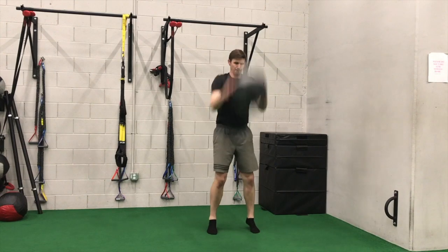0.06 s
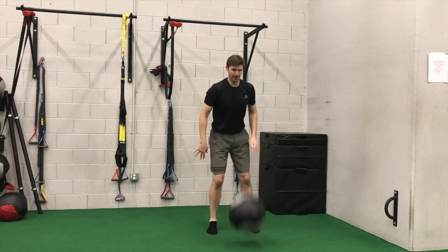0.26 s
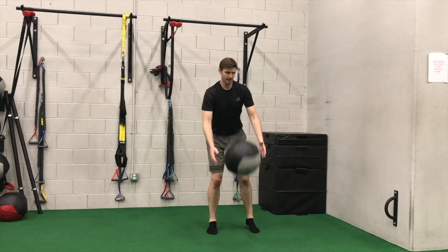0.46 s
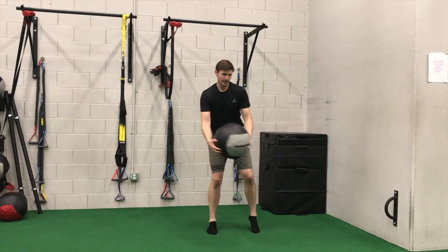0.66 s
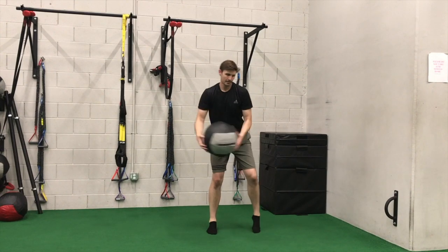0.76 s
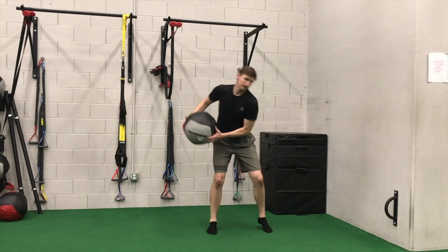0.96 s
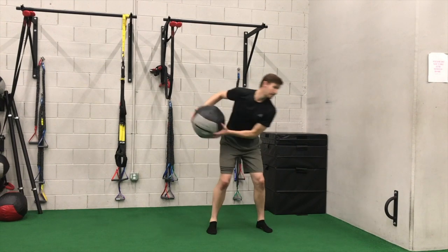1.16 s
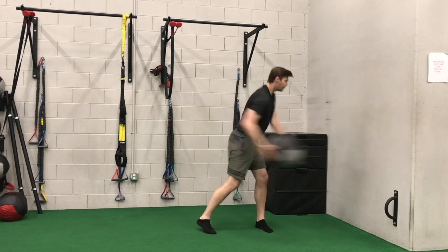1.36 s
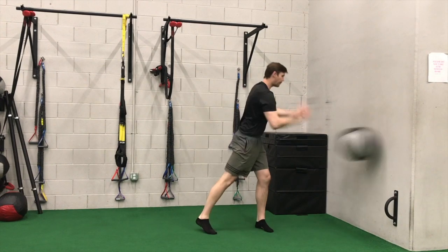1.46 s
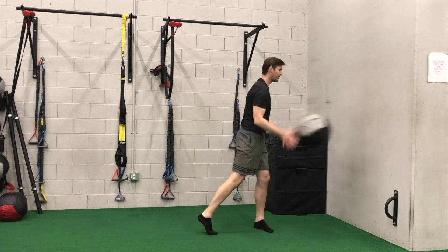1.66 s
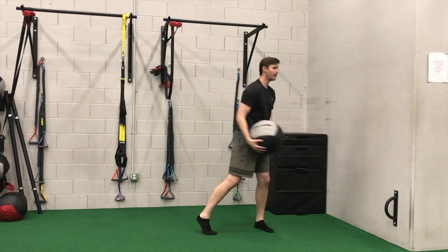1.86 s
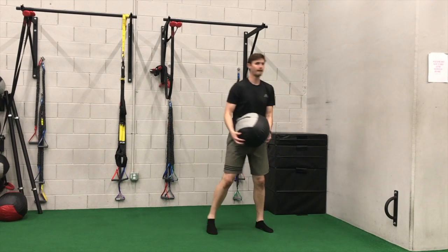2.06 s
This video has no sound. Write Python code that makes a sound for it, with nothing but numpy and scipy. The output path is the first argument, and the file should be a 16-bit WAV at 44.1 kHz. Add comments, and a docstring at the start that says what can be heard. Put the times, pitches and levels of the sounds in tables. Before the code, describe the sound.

A heavy medicine ball slams onto turf with a booming thud and is caught. About a second later it smacks brightly against a hard wall and is caught again. Both hits echo around a large gym.

```python
"""A heavy medicine ball in a large block-walled gym; ventilation hums faintly throughout.
Clothes rustle, hands pat the ball, then slam it onto turf: ball and floor thud, the room rings on.
The ball rebounds, humming until the hands catch and damp it. Feet shift on the turf.
Flung against a hard wall, its skin smacks brightly; quick echoes run into reverberation.
Hands catch it again."""
import sys
import numpy as np
from scipy import signal
from scipy.fft import rfft, irfft, next_fast_len
from scipy.io import wavfile
from scipy.ndimage import uniform_filter1d

SR = 44100
rng = np.random.default_rng(int(sys.argv[2]) if len(sys.argv) > 2 else 0)


def store_wav(level_fs):
    """Save 16-bit WAV to argv[1]."""
    pcm = np.round(np.clip(np.atleast_2d(level_fs), -1, 1) * 32767)
    wavfile.write(sys.argv[1], SR, pcm.T.astype(np.int16))


N = 92610
SLAM_S, SMACK_S = 0.2295, 1.5095

# Modes of ball and struck surface: pitch_hz, level_db, t60_s
BALL_FLOOR_MODES = [(186.7, -14.5, 0.18), (328.5, -12, 0.11), (388, -21.5, 0.18), (497, -14, 0.093),
                    (613, -19, 0.17), (683, -15.5, 0.1), (970, -25, 0.084), (1144, -23, 0.087),
                    (1220, -29, 0.076), (1707, -34.5, 0.12), (2294, -29.5, .08)]
SQUASH_BOOM_MODES = [(45.9, -16.5, 0.42), (74.6, -4.5, .2)]
BALL_WALL_MODES = [(49, -18, 0.34), (78.6, -17.5, .35), (160, -29, 0.49), (244.5, -26, .3),
                   (304, -33.5, 0.47), (613, -22, 0.083), (713, -20.5, 0.089), (1203, -35, 0.2),
                   (1535, -33, 0.075), (2271, -33.5, 0.22), (3444, -35, 0.29), (6260, -44, .2),
                   (7060, -38, .2), (8642, -37, .2), (9400, -27, 0.25)]
# Smack and its floor and side-wall echoes: delay_s, level_db, t60_s
SMACK_ARRIVALS = [(0, -13.5, 0.051), (.0055, -15.5, 0.072), (0.0107, -21, 0.043), (0.0159, -12, .06),
                  (.024, -23, 0.04)]
# Hands on the ball: start_s, slap_db, knock_db, knock_hz, thump_db, thump_hz
HAND_PATS = [(.119, -64, -38.5, 494, -60, 120), (.1375, -54, -26, 455, -41, 85),
             (.153, -60, -48, 332, -36.5, 180), (0.46, -73, -26.5, 594, -30.5, 183.4),
             (.597, -47, -35, 637, -64, 153), (.645, -72, -52, 302, -40, 148),
             (1.457, -40, -39, 560, -30, 112), (1.771, -30.5, -21, 563, -23, 81),
             (1.803, -48, -35, 1018, -32, 128)]
# Cloth and palms sliding: centre_s, level_db, width_s
RUSTLE_SWELLS = [(.07, -60.5, 0.028), (0.146, -51.5, 0.028), (0.594, -47.5, 0.016), (.85, -63.5, 0.081),
                 (1.41, -61.5, 0.11), (1.47, -55.5, 0.042), (1.821, -43, 0.026)]
# Air pushed aside by ball and arms: centre_s, level_db, width_s
WHOOSH_SWELLS = [(.14, -49.5, 0.021), (.226, -43, .012), (1.466, -46.5, 0.033), (1.507, -48, 0.0057)]
# Feet shifting on turf: start_s, level_db
FOOT_SCUFFS = [(1.237, -53), (1.321, -44.5), (1.427, -50)]
# Ventilation hum and whines: pitch_hz, level_db
VENT_TONES = [(59.2, -66), (2347, -82), (3133, -80), (4690, -80.5), (5480, -84.5), (6288, -88),
              (7074, -79.5), (7790, -89)]
# Room decay before stretch: freq_hz, t60_s
ROOM_DECAY = [(50, 1.37), (150, 1.38), (500, 1.04), (2000, 1.22), (4000, 1.19), (8000, 0.93), (11000, 1),
              (15000, 0.38)]

# Impact noise spectra (contact, near walls, whole room): freq_hz, relative_db
SLAM_CRACK_SPECTRUM = [(130, -12), (220, -7.5), (650, 3), (850, -9), (1200, -2), (1500, -13), (2300, -11),
                       (3000, -20), (4300, -21), (5300, -30), (8500, -27), (16000, -52)]
SLAM_NEAR_SPECTRUM = [(82, -33), (140, -4), (370, -6), (619, -5), (958, -23), (1320, -10.5), (1420, -28),
                      (2200, -18), (2850, -28.5), (4070, -28.5), (4870, -37), (8480, -29.5), (16000, -50)]
SLAM_FAR_SPECTRUM = [(36, -2.5), (55, -8), (80, -13), (118, -13), (175, -11), (240, -19.5), (285, -13.5),
                     (485, -21), (600, -13.5), (830, -22), (1200, -25.5), (2410, -33.5), (5000, -42.5),
                     (8540, -50.5), (12000, -70)]
SMACK_CRACK_SPECTRUM = [(120, -25), (200, -7.5), (490, -10), (700, -5), (900, -8.5), (1300, -8),
                        (2300, -7.5), (2700, -13), (3600, -12), (4500, -10), (4850, -14), (5500, -11.5),
                        (9200, -9), (10500, -13.5), (14500, -22), (16000, -29)]
SMACK_NEAR_SPECTRUM = [(65, -22), (110, -15), (167, -9), (243, -9.5), (454, -15), (607, -9.5), (921, -20.5),
                       (1550, -21), (2260, -13.5), (2900, -25), (3350, -15.5), (4880, -18), (8740, -12.5),
                       (16000, -42)]
SMACK_FAR_SPECTRUM = [(16, -26), (28, 9), (44, -0.5), (109, -7), (166, -4), (195, -10), (234, -3),
                      (340, -20), (578, -10.5), (1390, -22.5), (2180, -17.5), (2430, -20), (3520, -18.5),
                      (8460, -20), (16000, -45)]
# Handling and background noise spectra: freq_hz, relative_db
SKIN_SPECTRUM = [(300, -18), (1000, 3.5), (2000, -6), (5000, -10), (7500, -2), (9000, 0.5), (10500, -11),
                 (15500, -21)]
DULL_SPECTRUM = [(65, 1), (200, -1.5), (600, -4), (1200, -20), (3000, -29.5), (8000, -46)]  # palm knocks and whooshes
CLOTH_SPECTRUM = [(400, -12), (1000, 2), (2500, -4.5), (5000, -10.5), (7500, -5), (9000, -0.5),
                  (10500, -10), (15500, -21)]
SCUFF_SPECTRUM = [(200, -12), (700, 7), (2200, -3), (4000, -12), (9000, -19), (14000, -33)]
VENT_SPECTRUM = [(36, -2.5), (58, -5), (110, -16), (184, -21.5), (275, -18), (450, -24.5), (618, -21.5),
                 (837, -30.5), (1230, -30), (1490, -38.5), (1910, -28.5), (2800, -37.5), (4140, -35.5),
                 (7190, -42), (9000, -35), (10500, -42.5), (12000, -49), (16000, -58)]


def floor_slam(squash_s=0.0057):
    """Turf dulls the crack; the ball flattens and booms; near walls, then the whole room answer."""
    modes = ring(SLAM_S, BALL_FLOOR_MODES)
    boom = ring(SLAM_S + squash_s, SQUASH_BOOM_MODES)
    contact = strike(SLAM_S, attack_s=0.0004, t60_s=0.038)
    contact += amp(-11) * strike(SLAM_S + 0.01, attack_s=0.003, t60_s=0.047)
    crack = amp(-10.5) * noise(SLAM_CRACK_SPECTRUM) * contact
    near = amp(-23) * noise(SLAM_NEAR_SPECTRUM) * strike(SLAM_S + 0.0028, attack_s=0.0024, t60_s=0.37)
    far = amp(-27) * reverb_tail(SLAM_S, SLAM_FAR_SPECTRUM, build_s=0.039, stretch=1.0)
    return modes + boom + crack + near + far


def wall_smack():
    """Skin slaps flat on the hard wall; a volley of echoes runs into reverberation."""
    crack = sum(amp(db) * noise(SMACK_CRACK_SPECTRUM) * strike(SMACK_S + delay_s, 0.0003, t60_s)
                for delay_s, db, t60_s in SMACK_ARRIVALS)
    near = amp(-19.5) * noise(SMACK_NEAR_SPECTRUM) * strike(SMACK_S + 0.014, attack_s=0.013, t60_s=0.38)
    far = amp(-26) * reverb_tail(SMACK_S, SMACK_FAR_SPECTRUM, build_s=0.076, stretch=1.08)
    return ring(SMACK_S, BALL_WALL_MODES) + crack + near + far


def rebound(start_s=0.31, caught_s=0.483, pitch_hz=85.4, rise_s=0.015, t60_s=0.087):
    """The ball hums in flight until the hands damp it."""
    rise = np.clip(since(start_s) / rise_s, 0, 1)
    damping = amp(-60 * since(caught_s) / t60_s)
    return amp(-31.5) * rise * damping * np.sin(2 * np.pi * pitch_hz * since(start_s))


def hands(knock_t60_s=0.03, thump_t60_s=0.13):
    """Each pat slaps the skin, knocks the hollow shell and thumps the filling."""
    out = np.zeros(N)
    for start_s, slap_db, knock_db, knock_hz, thump_db, thump_hz in HAND_PATS:
        out += amp(slap_db) * noise(SKIN_SPECTRUM) * strike(start_s, 0.00035, t60_s=0.045)
        out += amp(knock_db - 10.5) * noise(DULL_SPECTRUM) * strike(start_s, 0.00033, t60_s=0.04)
        out += ring(start_s, [(knock_hz, knock_db, knock_t60_s), (thump_hz, thump_db, thump_t60_s)])
    return out


def movement(grain_db=3.6):
    """Cloth slides in grainy swells, displaced air whooshes, feet scuff the turf."""
    flicker = unit_rms(uniform_filter1d(rng.standard_normal(N), size=130))
    grain = unit_rms(amp(grain_db * flicker))
    rustle = swells(RUSTLE_SWELLS) * grain * noise(CLOTH_SPECTRUM)
    whoosh = swells(WHOOSH_SWELLS) * noise(DULL_SPECTRUM)
    steps = sum(amp(db) * strike(start_s, 0.00068, t60_s=0.028) for start_s, db in FOOT_SCUFFS)
    return rustle + whoosh + steps * noise(SCUFF_SPECTRUM)


def reverb_tail(start_s, spectrum, build_s, stretch):
    """Late reverberation: builds up, then decays per frequency; stretch scales the room's t60."""
    hz, time_s, bins = signal.stft(noise(spectrum), SR, nperseg=512)
    t60_s = stretch * log_interp(ROOM_DECAY, hz)[:, None]
    fade = amp(-60 * np.maximum(time_s - start_s, 0) / t60_s)
    tail = signal.istft(bins * fade, SR, nperseg=512)[1][:N]
    return tail * (1 - np.exp(-since(start_s) / build_s))


def in_room(x, wet_db):
    """A small sound plus its faint reverberation."""
    tail = reverb_tail(0, [(40, 0), (16000, 0)], build_s=0.0036, stretch=0.61)
    return x + amp(wet_db) * signal.fftconvolve(x, tail / np.linalg.norm(tail))[:N]


def ventilation(drift_rad=4.3):
    """Steady rumble and hiss, with a hum and thin whines that wander in phase."""
    tones = np.zeros(N)
    for hz, db in VENT_TONES:
        walk = np.cumsum(rng.standard_normal(N)) / np.sqrt(SR)  # rms 1 after 1 s
        phase_rad = 2 * np.pi * hz * since(0) + drift_rad * np.sqrt(hz / 3000) * walk
        tones += amp(db) * np.sqrt(2) * np.sin(phase_rad)
    return amp(-55.5) * noise(VENT_SPECTRUM) + tones


def ring(start_s, modes, attack_cycles=0.44):
    """Struck, damped modes; low ones swell more slowly."""
    return sum(amp(db) * strike(start_s, attack_cycles / hz, t60_s)
               * np.sin(2 * np.pi * hz * since(start_s)) for hz, db, t60_s in modes)


def strike(start_s, attack_s, t60_s):
    """Envelope: rise, then exponential decay."""
    age_s = since(start_s)
    return (1 - np.exp(-age_s / attack_s)) * amp(-60 * age_s / t60_s)


def swells(rows):
    """Envelope: exponential rise and fall about each centre."""
    return sum(amp(db) * np.exp(-np.abs(since(0) - centre_s) / width_s) for centre_s, db, width_s in rows)


def noise(spectrum):
    """Coloured noise, rms 1, rolled off at the low end."""
    corner_hz = max(spectrum[0][0], 36)
    gain = lambda hz: amp(log_interp(spectrum, hz)) * np.minimum(hz / corner_hz, 1) ** 3
    return unit_rms(filtered(rng.standard_normal(N), gain))


def filtered(x, gain):
    """Zero-phase filter by gain(hz)."""
    size = next_fast_len(N + 8192)
    return irfft(rfft(x, size) * gain(np.fft.rfftfreq(size, 1 / SR)), size)[:N]


def log_interp(points, hz):
    """Interpolate on a log frequency axis."""
    freqs_hz, values = np.transpose(points)
    return np.interp(np.log(hz + 1), np.log(freqs_hz + 1), values)


def since(start_s):
    """Elapsed seconds, zero before the start."""
    return np.maximum(np.arange(N) / SR - start_s, 0)


def amp(db):
    return 10 ** (np.asarray(db) / 20)


def unit_rms(x):
    return x / np.sqrt(np.mean(x ** 2) + 1e-20)


def scene():
    """Both throws, handling and ventilation; mono."""
    ball = floor_slam() + rebound() + wall_smack()
    handling = in_room(hands() + movement(), wet_db=-8.5)
    return (ball + handling + ventilation())[None]


def record(dry):
    """Low cut, dulled top octave, rounded peaks, band limit."""
    low_cut_hz, top_hz, ceiling = 34, 16000, 0.52
    treble_hz_db = [(8800, -0.5), (9550, -1), (10300, -4.5), (13000, -1.5), (15500, -1)]
    x = signal.sosfilt(signal.butter(3, low_cut_hz, "highpass", fs=SR, output="sos"), dry[0])
    x = filtered(x, lambda hz: amp(log_interp(treble_hz_db, hz)))
    x = x / (1 + np.abs(x / ceiling) ** 6) ** (1 / 6)
    return filtered(x, lambda hz: hz < top_hz)[None]


dry = scene()
out = record(dry)
store_wav(out)
```